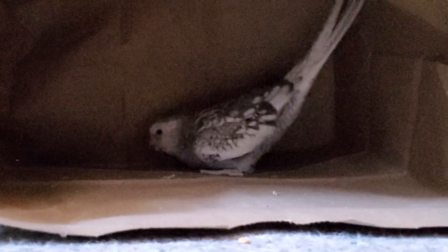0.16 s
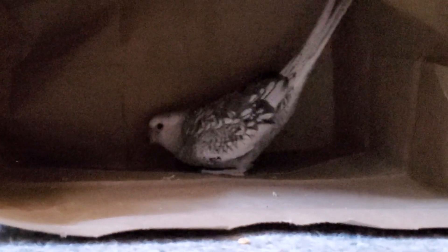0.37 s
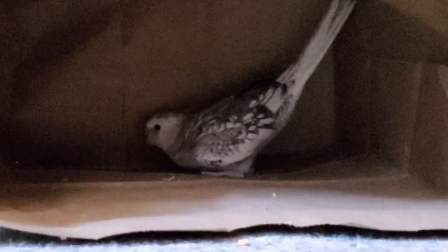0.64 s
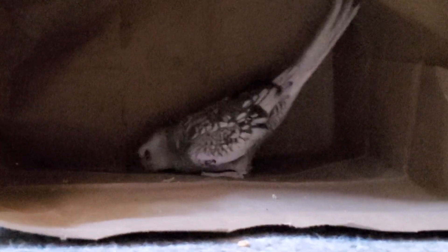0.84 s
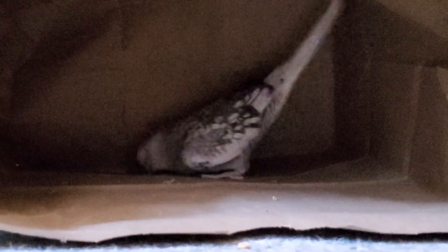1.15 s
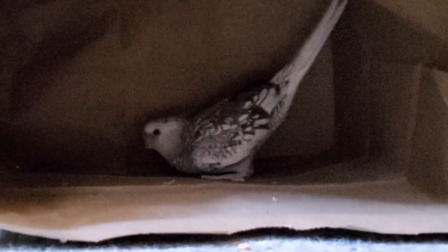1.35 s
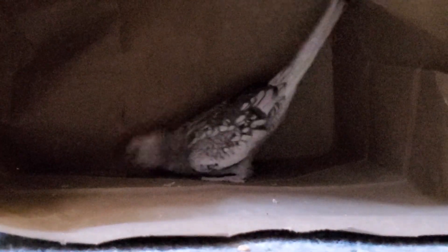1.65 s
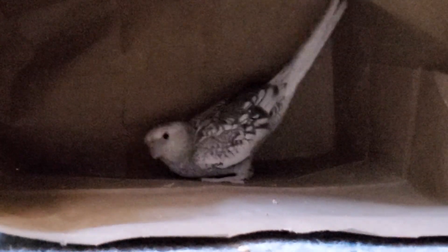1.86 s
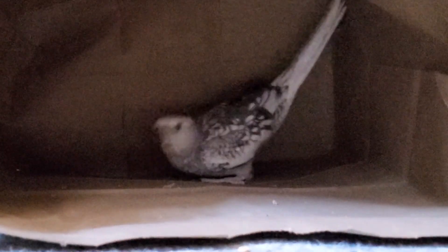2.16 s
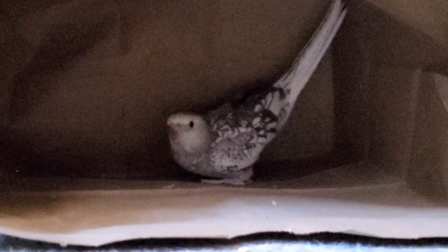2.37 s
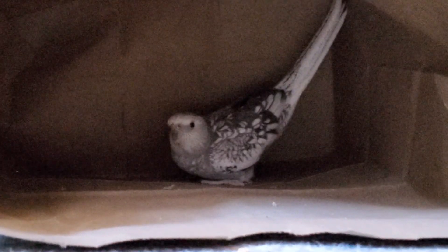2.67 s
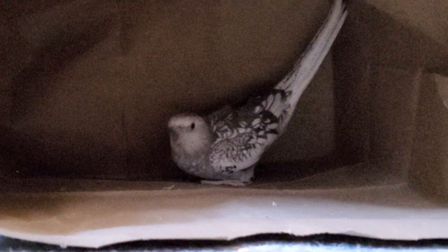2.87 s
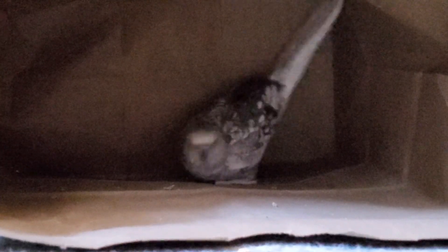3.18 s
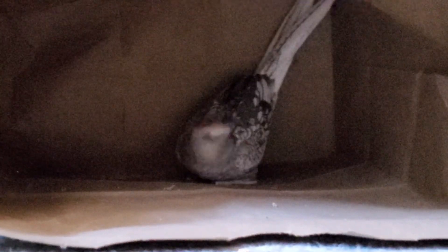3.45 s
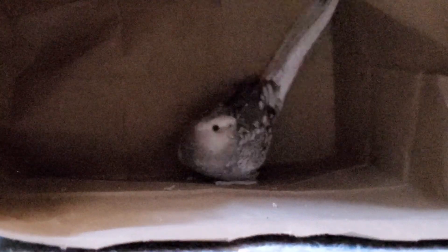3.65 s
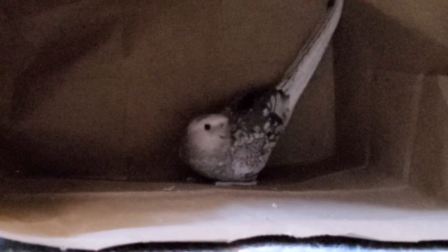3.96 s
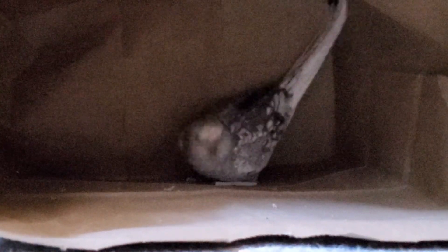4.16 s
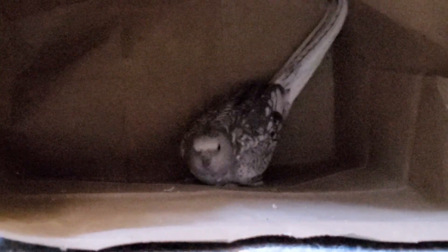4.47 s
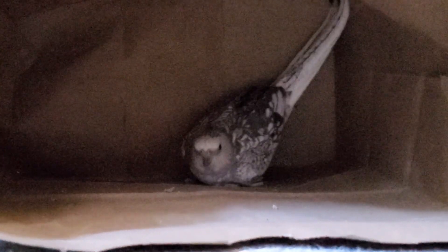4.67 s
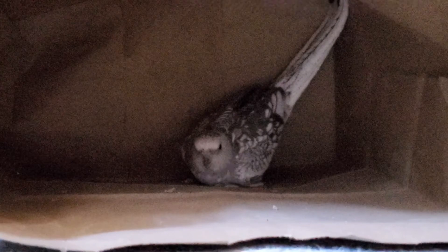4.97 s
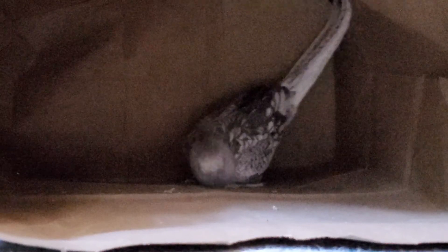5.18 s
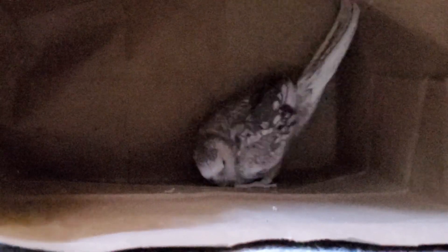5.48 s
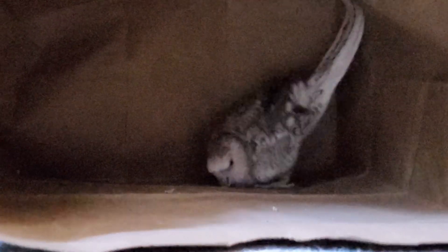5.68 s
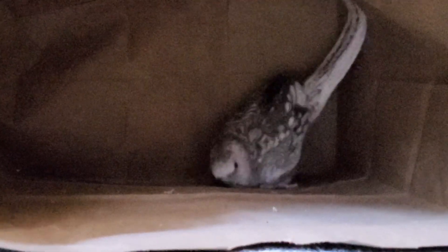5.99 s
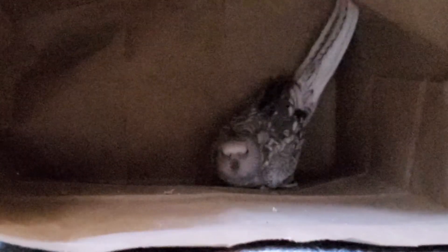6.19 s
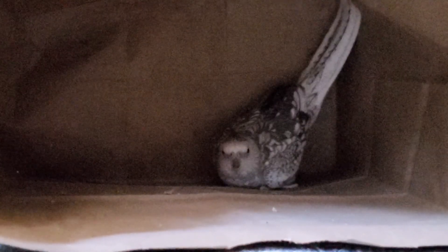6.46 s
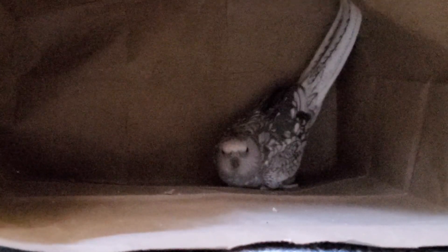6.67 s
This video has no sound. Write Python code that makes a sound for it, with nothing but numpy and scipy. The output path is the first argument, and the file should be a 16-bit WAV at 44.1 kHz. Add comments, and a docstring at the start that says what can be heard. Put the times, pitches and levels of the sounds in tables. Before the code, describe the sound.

A small bird's beak and claws tap and scrape inside a paper bag in irregular bursts, with soft foot thuds and quiet pauses.

```python
"""A small pet bird forages in a large paper bag on a carpet in a quiet room; a close stereo microphone at
the opening hears it over low rumble and its own hiss, both filtered noise. Beak and claws tap the paper
(struck modes), feet thud on the bottom (duller blows), claws scrape (friction noise through resonances),
the slack wall sways (slow wandering tones) and feathers brush along it (fine clicks). The bustle pauses
after 1.7 s, stirs again near 3 and 4.2 s, is busy from 5 to 6.1 s and then dies down."""
import sys
import numpy as np
from scipy import signal
from scipy.fft import rfft, irfft, next_fast_len
from scipy.io import wavfile

SR = 44100
rng = np.random.default_rng(int(sys.argv[2]) if len(sys.argv) > 2 else 0)


def to_wav(s):
    """Save 16-bit WAV."""
    ch = np.atleast_2d(s).T  # columns
    pcm = np.round(np.clip(ch, -1, 1) * 32767)  # PCM
    wavfile.write(sys.argv[1], SR, pcm.astype(np.int16))


N = 301203


def from_db(db):
    """Decibels to gain."""
    return 10 ** (np.asarray(db) / 20)


def rms_one(x):
    """Scale to rms 1."""
    return x / np.sqrt(np.mean(x ** 2) + 1e-20)


def at_hz(points, hz):
    """Read a table on a log-frequency axis."""
    freq, value = np.transpose(points)
    return np.interp(np.log(np.maximum(hz, 1)), np.log(freq), value)


def colour(x, spectrum):
    """Shape a sound with a smooth spectrum."""
    size = next_fast_len(N + 4096)
    gain = from_db(at_hz(spectrum, np.fft.rfftfreq(size, 1 / SR)))
    return irfft(rfft(x, size) * gain, size)[..., :N]


def band(x, low_hz, high_hz, order=2):
    """Causal band-pass, its upper edge kept below half the sample rate."""
    edges = [low_hz, min(high_hz, SR / 2 - 1)]
    return signal.sosfilt(signal.butter(order, edges, "band", fs=SR, output="sos"), x)


def resonate(x, hz, width_hz):
    """One resonance with gain 1 on top."""
    r = np.exp(-np.pi * width_hz / SR)
    feedback = [1, -2 * r * np.cos(2 * np.pi * hz / SR), r * r]
    return signal.lfilter(np.array([1, 0, -1]) * (1 - r * r) / 2, feedback, x)


def stereo(mid, side, likeness):
    """Two unrelated noises make a left-right pair whose correlation is the likeness."""
    shared = np.sqrt(1 + likeness) * mid
    opposed = np.sqrt(1 - likeness) * side * [[1], [-1]]
    return (shared + opposed) / np.sqrt(2)


def add(track, s, sound):
    """Mix a short stereo sound in at a given time."""
    at = int(s * SR)
    track[:, at:at + sound.shape[1]] += sound[:, :N - at]


# rumble of the quiet room: (frequency [Hz], relative level [dB per Hz])
ROOM_RUMBLE = [(20, 1), (45, 2.5), (62, -1), (76, 15), (95, -3), (140, -11.5), (300, -15), (600, -25),
               (1200, -61), (3000, -38)]
# self-noise of the left and right microphone, against white noise: (frequency [Hz], level [dB])
LEFT_SELF_NOISE = [(500, -13.5), (2100, -18), (3000, -11.5), (3700, -18), (4800, -6), (5400, -11),
                   (6100, -0.5), (7000, -6.5), (8100, -6.5), (9000, -16.5), (11700, -8.5), (13500, -13.5),
                   (16000, -11)]
RIGHT_SELF_NOISE = [(500, -9.5), (2200, -18.5), (5200, -14), (6200, -10), (7000, -13.5), (8000, -31.5),
                    (10500, -18), (16000, -20.5)]


def background(rumble_db=-67.5, hiss_db=-56):
    """Low room rumble largely common to both sides, and each microphone's own unrelated hiss."""
    rumble = rms_one(colour(stereo(*rng.standard_normal((2, N)), likeness=0.69), ROOM_RUMBLE))
    spectra = LEFT_SELF_NOISE, RIGHT_SELF_NOISE
    hiss = np.array([colour(rng.standard_normal(N), spectrum) for spectrum in spectra])
    return from_db(rumble_db) * rumble + from_db(hiss_db) * hiss


# modes of the paper panels and the air between them: (frequency [Hz], width [Hz], level over direct [dB])
BAG_MODES = [(68.9, 11, 21), (200, 20, 4), (263.7, 26.7, 4.5), (311, 19, -8.5), (460, 29, -6.5),
             (560, 59, 5.5), (600, 24.2, -14.5), (783, 45, -12), (1005, 20, -9), (1135, 127, 0),
             (1530, 61, -2.5), (1770, 120, -7), (1900, 96, -7), (2573, 59, 10), (2843, 98, 0.5),
             (3010, 81, 6.5), (3480, 64, -32.5), (5200, 40.1, -4), (5280, 90, -2)]
# decay of the tail scattered in bag and room: (frequency [Hz], time to fall 60 dB [s])
ROOM_DECAY = [(100, 0.54), (300, 0.21), (800, 0.05), (2000, 0.22), (5000, 0.23), (16000, 0.1284)]
# how alike the tail arrives at the two ports: (frequency [Hz], left-right correlation [-1 to 1])
PORT_LIKENESS = [(60, 0.84), (600, 0.81), (1400, 0.36), (3000, 0.337), (6000, 0), (16000, 0.35)]


def bag_response(scatter_db, scatter_t60, tilt_db, room_db, count=12000):
    """Direct sound, ringing panels, quick scatter between the walls and a room tail."""
    t, click = np.arange(count) / SR, signal.unit_impulse(count)
    body = click + sum(from_db(db) * resonate(click, hz, width) for hz, width, db in BAG_MODES)
    tail = 0
    for low in 125 * 2. ** np.arange(8):
        hz = low * np.sqrt(2)
        noise = band(rng.standard_normal((2, count)), low, 2 * low)
        noise = stereo(*noise, at_hz(PORT_LIKENESS, hz))
        # scatter_db holds at 1 kHz and changes by tilt_db with each octave up
        scatter = scatter_db + tilt_db * np.log2(hz / 1000), scatter_t60
        room = room_db, at_hz(ROOM_DECAY, hz)
        for db, t60 in scatter, room:
            fade = from_db(-60 * t / t60) * (1 - np.exp(-t / 0.00011))
            tail = tail + from_db(db) * noise * fade / np.linalg.norm(fade)
    return body + tail


def blow(response, hz, damping, top_ratio, crack_db, count=6000):
    """A struck spot swings as a damped mode, band-limited with a faint full-band crack; peak 1."""
    swing = resonate(signal.unit_impulse(count), hz, damping * hz)
    pulse = band(swing, hz / (2.0 + 3.2 * damping), hz * top_ratio, order=3)
    pulse = pulse + from_db(crack_db) * swing
    sound = signal.fftconvolve(response, pulse[None], axes=1)
    return sound / np.abs(sound).max()


# beak and claws hit the paper, before overtone, rebound and port colour:
# (time [s], peak level [dB], pitch of the struck spot [Hz], damping [width / pitch])
BEAK_AND_CLAW_TAPS = [(.1118, -24.5, 520, 2.9), (0.1121, -33, 2930, 0.052), (.129, -29.5, 900, .5),
                      (0.28, -56, 2480, 0.86), (0.308, -37, 398, 1.7), (.329, -37, 600, 0.54),
                      (0.445, -47, 1250, 0.18), (0.482, -25.5, 664, 0.46), (0.748, -30.5, 644, 2.5),
                      (.860, -35, 5030, 0.054), (.961, -33, 1120, 0.65), (1.019, -32.5, 1150, 0.35),
                      (1.073, -32, 1260, 0.32), (1.129, -41, 2200, 1.4), (1.686, -22.5, 650, 0.17),
                      (1.689, -31.5, 1190, .15), (3.016, -29, 610, 1.2), (3.018, -33.5, 2180, .25),
                      (3.0205, -30, 970, 0.68), (3.036, -32.5, 1400, 0.36), (3.046, -37, 340, 0.69),
                      (3.868, -61, 815, 0.16), (4.141, -47, 2540, .8), (4.254, -33.5, 907, 0.12),
                      (4.628, -53, 804, 1.3), (5.077, -42, 880, 3.7), (5.116, -52.5, 900, 1.7),
                      (5.2077, -28.5, 770, 4.6), (5.22, -39, 298, 0.083), (5.237, -32.5, 1500, .15),
                      (5.3075, -27.5, 475, 0.92), (5.313, -29.5, 810, 0.72), (5.42, -25, 640, 0.39),
                      (5.501, -38, 550, 1.8), (5.585, -32.5, 607, 0.18), (5.646, -19, 1240, 0.75),
                      (5.675, -33, 920, 1.5), (5.682, -35, 373, 0.5), (5.997, -33, 920, 0.22),
                      (6.0836, -27, 1420, 0.38), (6.09, -31.5, 482, .45), (6.489, -48.5, 6200, 1),
                      (6.684, -58.5, 830, 0.068)]
# parts of a tap: (delay [s], level [dB], pitch [ratio])
TAP_PARTS = (
    (0, 0, 1),
    (0, -8.5, 1.79),  # a second, higher mode of the struck spot
    (0.00399, -13, 0.796))  # the paper springs back and touches once more, softer and lower


def taps():
    """Hard contacts of beak and claws: the struck spot's two modes, then the rebound."""
    out = np.zeros((2, N))
    response = bag_response(scatter_db=-1.5, scatter_t60=0.022, tilt_db=2.0, room_db=-4)
    for s, db, hz, damping in BEAK_AND_CLAW_TAPS:
        for delay, part_db, pitch in TAP_PARTS:
            hit = blow(response, hz * pitch, damping, top_ratio=1.87, crack_db=-19.5)
            add(out, s + delay, from_db(db + part_db) * hit)
    return out


# soft steps on the bottom of the bag, before port colour: (time [s], peak level [dB], pitch [Hz])
FOOTSTEPS = [(.113, -35, 100), (0.15, -39, 101), (.217, -54, 67.5), (0.314, -52, 175), (0.659, -58.5, 125),
             (0.774, -39.5, 157), (1.081, -44.5, 182), (1.688, -30.5, 154), (1.700, -28.5, 232),
             (1.862, -49, 105), (2.546, -62.5, 200), (3.02, -44.5, 200), (3.093, -50.5, 107),
             (3.24, -50.5, 126), (4.229, -47.5, 180), (4.991, -60, 98), (5.017, -54, 108),
             (5.075, -52.5, 200), (5.116, -48.5, 105), (5.218, -52, 113), (6.052, -48, 214)]


def steps():
    """Dull thuds of the feet, cushioned by the carpet: low blows whose scatter weakens with pitch."""
    out = np.zeros((2, N))
    response = bag_response(scatter_db=-4.5, scatter_t60=0.15, tilt_db=-3.0, room_db=-8.5)
    for s, db, hz in FOOTSTEPS:
        add(out, s, from_db(db) * blow(response, hz, damping=0.44, top_ratio=3.3, crack_db=-40))
    return out


def swell(s, length, db):
    """Sample positions and gain of one movement: it takes hold firmly and lets go gently."""
    rise = length * 0.47
    fall = length - rise
    start, end = max(0, int((s - np.pi * rise) * SR)), min(N, int((s + np.pi * fall) * SR))
    at = np.arange(start, end)
    t = at / SR - s
    drop = np.where(t < 0, np.abs(t / rise) ** 2.4, (t / fall) ** 2)
    return at, from_db(db) * np.exp(-drop)


def play(texture, movements):
    """A steady texture sounds only during its movements."""
    out = np.zeros(N)
    for movement in movements:
        at, gain = swell(*movement)
        out[at] += gain * texture[at]
    return out


def slips(per_s, spread_db, smooth_db):
    """Paper fibres catch and let go: clicks of uneven size over smooth friction."""
    sizes = from_db(spread_db * np.minimum(rng.exponential(1, N), 3)) * rng.choice([-1, 1], N)
    clicks = rms_one(sizes * (rng.random(N) < per_s / SR))
    return clicks + from_db(smooth_db) * rng.standard_normal(N)


def crinkles(per_s, damping, low_hz, high_hz, count=18):
    """Small creases snap at random, each ringing at one of a set of pitches; rms 1."""
    snaps = (rng.random(N) < per_s / SR) * rng.uniform(-1.03, 1, N) + 1e-18
    crease, out = rng.integers(0, count, N), 0
    for k, hz in enumerate(np.geomspace(low_hz, high_hz, count)):
        out = out + resonate(snaps * (crease == k), hz, damping * hz) / np.sqrt(hz)
    return rms_one(out)


# feathers and claws sliding on paper: (frequency [Hz], relative level [dB per Hz])
SLIDING_FRICTION = [(2000, -10.5), (3000, -4), (4000, -15.5), (5500, -8.5), (7500, -15.5), (10000, -17.5),
                    (16000, -20)]


def fibre_hiss(crinkle_db):
    """Fine friction with small creases snapping in it."""
    friction = colour(slips(per_s=3000, spread_db=2.0, smooth_db=-7.0), SLIDING_FRICTION)
    smooth = rms_one(band(friction, 2300, 17000, order=3))
    snaps = crinkles(per_s=120, damping=0.068, low_hz=1510, high_hz=8880)
    return smooth + from_db(crinkle_db) * snaps


def judder(count, per_s=130, spread_db=3):
    """Gain of a contact that grips and slips at random."""
    knots = rng.standard_normal(400)
    curve = np.interp(np.arange(count) * per_s / SR, np.arange(len(knots)), knots)
    return from_db(spread_db * curve)


# beak and claws drag over the paper; a light, quick drag is bright: hiss gains what the panel drone loses
# (time of the peak [s], length [s], level [dB], brightness [dB], pitch of the touched panel [Hz])
DRAGS = [(.117, 0.019, -40.5, -1.5, 283), (.133, 0.016, -40, -3.5, 536), (.318, 0.053, -52, -3.5, 220),
         (.467, 0.038, -50.5, 5.5, 720), (.752, 0.011, -39, 4, 200), (.802, 0.054, -43, 0.5, 610),
         (.885, 0.088, -50.5, 4, 590), (.977, 0.037, -44.5, 2, 590), (1.024, 0.03, -48, 6, 550),
         (1.094, 0.064, -42, 2, 635), (1.153, 0.03, -47.5, 7.5, 770), (1.691, 0.018, -41.5, 1, 565),
         (1.715, 0.017, -37.5, 8, 255.7), (2.25, 0.31, -79.5, -0.5, 355), (2.377, .055, -70.5, 3, 497),
         (2.978, 0.057, -58, 2, 413), (3.012, 0.047, -50.5, 0, 547), (3.044, 0.036, -56, -13.5, 326),
         (4.205, 0.1, -52.5, -2, 405), (4.247, 0.02, -48, 2, 810), (4.283, 0.069, -61, -1.5, 300.5),
         (5.243, 0.096, -48, 1.5, 312), (5.283, 0.026, -42.5, 7, 320), (5.31, 0.014, -40.5, -0.5, 776),
         (5.39, 0.14, -51.5, 7, 514), (5.54, 0.038, -52.5, 12.5, 756), (5.579, 0.019, -38, 0.5, 625),
         (5.657, .065, -45, 0.5, 540), (5.815, .22, -57.5, 4.5, 460), (6.0, .026, -54.5, 1, 540),
         (6.065, 0.14, -58.5, 0, 577), (6.39, 0.27, -73.5, 3.5, 490), (6.58, 0.04, -67.5, -2, 303)]
# parts of a stroke, relative to its level [dB]; the crackle is larger creases giving way
DRONE_DB, RASP_DB, FIBRE_DB, CRACKLE_DB = -1.5, -8, -7.5, -8
RASP_HZ, RASP_SPREAD_OCTAVES = 1305, 0.31  # each stroke finds a slightly different stiff spot
BRUSH_BRIGHT_DB, BRUSH_PANEL_HZ = 13.5, 520  # all feather brushes are light


def scrapes(count=16000):
    """Pressed panel drones, claws rasp on a stiffer spot, fibres hiss and creases crackle, all in the bag."""
    response = bag_response(scatter_db=-2.5, scatter_t60=0.031, tilt_db=4.0, room_db=-2.0)

    def loudness(x):
        """Rms that a steady friction has once it rings in the bag."""
        return np.sqrt(np.sum(signal.fftconvolve(x[:count], response.mean(0)) ** 2) / count)

    rough = slips(per_s=900, spread_db=4.5, smooth_db=-2.0)
    low, middle = band(rough, 120, 820), band(rough, 782, 2700, order=3)
    # the hiss comes from many spots at once, so the two ports share little of it
    hiss = stereo(*[fibre_hiss(crinkle_db=-3.5) for _ in range(2)], likeness=0.34)
    hiss = hiss / loudness(hiss[0])
    crackle = crinkles(per_s=170, damping=0.11, low_hz=633, high_hz=2850)
    crackle = from_db(CRACKLE_DB) * crackle / loudness(crackle)

    out = np.zeros((2, N))
    strokes = list(DRAGS) + [(*brush, BRUSH_BRIGHT_DB, BRUSH_PANEL_HZ) for brush in FEATHER_BRUSHES]
    for s, length, level_db, bright_db, drone_hz in strokes:
        crease, spot = rng.random(2)
        at, gain = swell(s, length, level_db)
        # a crease tints each stroke's hiss somewhere between 2500 and 9000 Hz
        tint_hz = 2500 * (9000 / 2500) ** crease
        tinted = hiss[:, at] + from_db(-2) * resonate(hiss[:, at], tint_hz, tint_hz / 4)
        out[:, at] += from_db(FIBRE_DB + bright_db) * gain * judder(len(at)) * tinted
        out[:, at] += gain * crackle[at]
        rasp_hz = RASP_HZ * 2 ** (RASP_SPREAD_OCTAVES * (2 * spot - 1))
        drone = low, drone_hz, DRONE_DB - bright_db, .33
        rasp = middle, rasp_hz, RASP_DB, .45
        for friction, hz, db, damping in drone, rasp:
            ringing = resonate(friction, hz, damping * hz)
            out[:, at] += from_db(db) * gain * judder(len(at)) * ringing[at] / loudness(ringing)
    return signal.fftconvolve(response, out, axes=1)[:, :N]


# slow modes of the slack wall: (frequency [Hz], width [Hz], relative level [dB])
WALL_MODES = [(33, 17, 6.5), (73.9, 12, 0.5)]
# the wall moves: (time of the peak [s], length [s], level [dB])
WALL_SWAYS = [(0.144, 0.094, -55), (1.54, 0.11, -61.5), (1.613, 0.069, -41), (1.7, 0.1, -52.5),
              (2.403, 0.11, -60), (4.273, .13, -67), (5.29, 0.33, -66.5), (6.56, .14, -71)]


def sway():
    """The loose wall flaps slowly as the bird shifts its weight: low tones of wandering phase."""
    t, flap = np.arange(N) / SR, 0
    for hz, width, db in WALL_MODES:
        wander = np.cumsum(rng.standard_normal(N)) * np.sqrt(2 * np.pi * width / SR)
        flap = flap + from_db(db) * np.sin(2 * np.pi * hz * t + wander)
    return play(rms_one(band(flap, 16, 150, order=4)), WALL_SWAYS)


# feathers brush along the wall; scrapes() adds their rub: (time of the peak [s], length [s], level [dB])
FEATHER_BRUSHES = [(0.283, 0.04, -68.5), (3.319, 0.084, -76.5), (3.683, 0.14, -67), (4.136, 0.04, -72.5),
                   (4.202, 0.076, -68)]
SIZZLE_DB = 11  # over the brush's level


def feathers():
    """Barbs flick past each other: a fine, bright sizzle, different at each port."""
    sizzle = np.array([slips(per_s=1600, spread_db=3, smooth_db=-10) for _ in range(2)])
    sides = band(sizzle, 4800, SR / 2)
    return from_db(SIZZLE_DB) * np.array([play(rms_one(side), FEATHER_BRUSHES) for side in sides])


# colour of the two microphone ports towards the bag: (frequency [Hz], level [dB])
LEFT_PORT_COLOUR = [(60, 8.5), (400, 1.5), (1300, -1.5), (2400, 0), (4200, 1.5), (5200, -4), (6200, -3.5),
                    (8000, -4), (9500, -3.5), (16000, -5.5)]
RIGHT_PORT_COLOUR = [(60, 11.5), (400, 3), (1300, 0.5), (2400, -3.5), (4200, 5), (5000, 4), (6300, 9.5),
                     (8000, -3.5), (10300, 5), (12500, -1), (16000, 2)]
PORT_LAG_SAMPLES = 2


def scene():
    """The bird in the bag, heard through the two ports; the right one lies a little farther away."""
    left, right = taps() + steps() + scrapes() + sway() + feathers()
    right = np.roll(right, PORT_LAG_SAMPLES)
    bird = np.array([colour(left, LEFT_PORT_COLOUR), colour(right, RIGHT_PORT_COLOUR)])
    return bird + background()


def record(dry, cutoff_hz=15900):
    """The top is cut steeply by an elliptic low-pass."""
    return signal.sosfilt(signal.ellip(12, .1, 80, cutoff_hz, fs=SR, output="sos"), dry)


dry = scene()
out = record(dry)
to_wav(out)
```